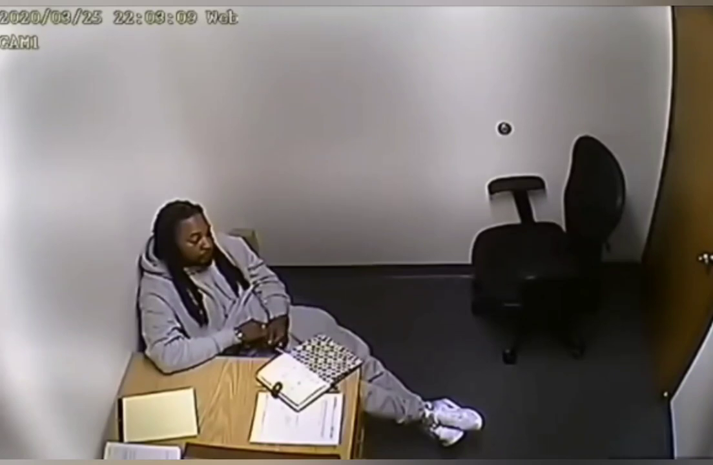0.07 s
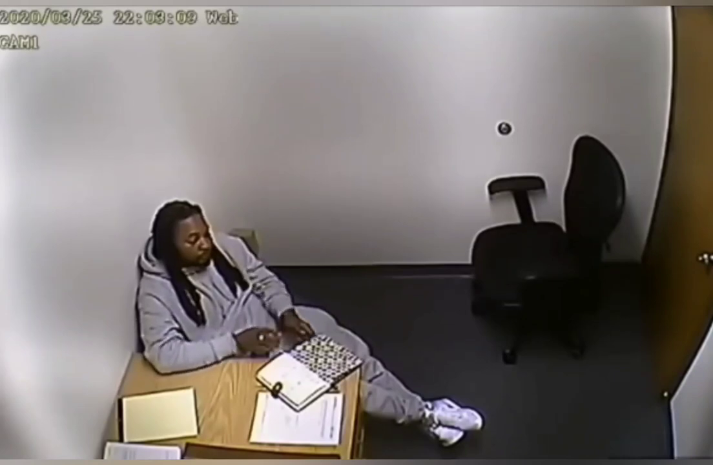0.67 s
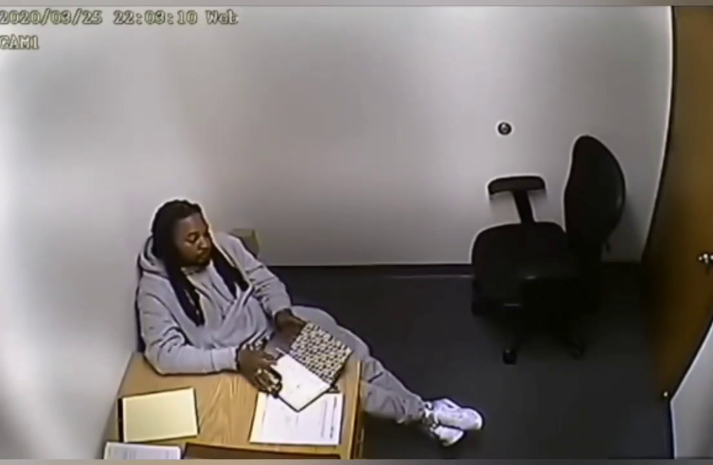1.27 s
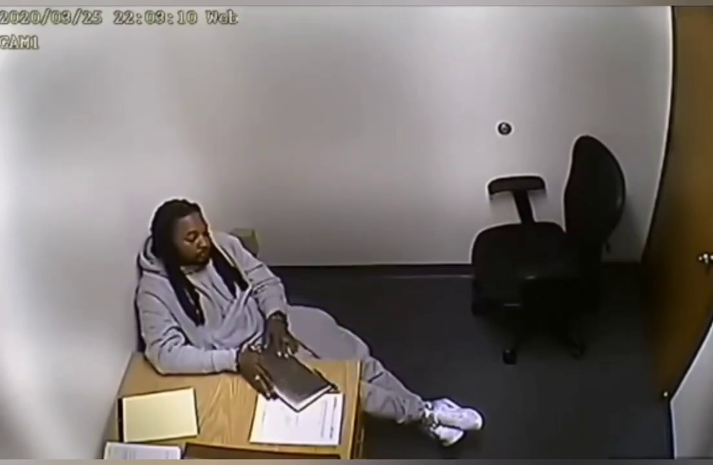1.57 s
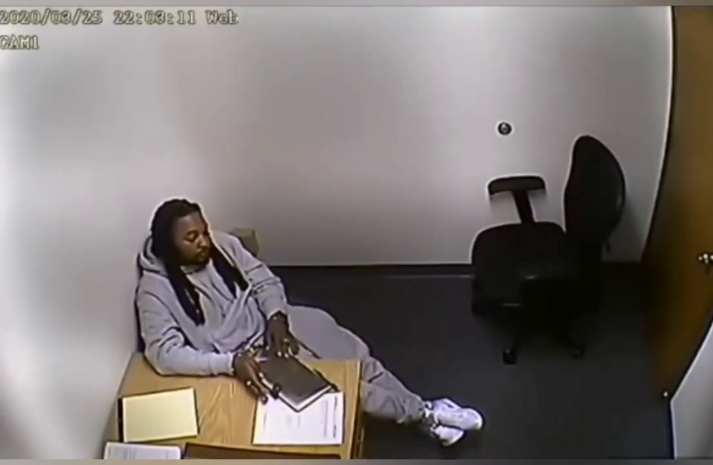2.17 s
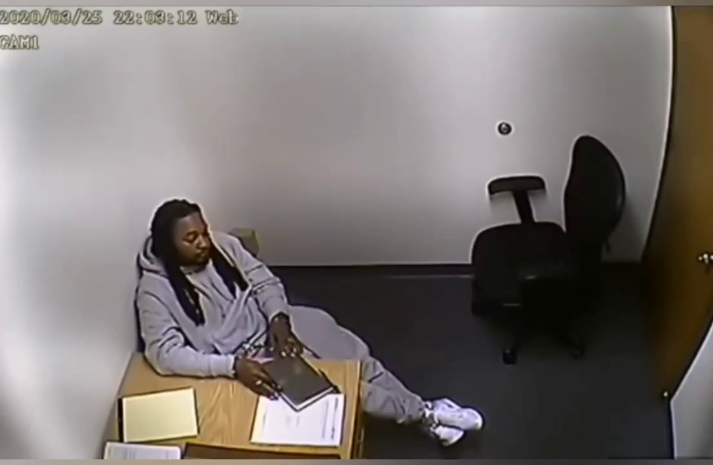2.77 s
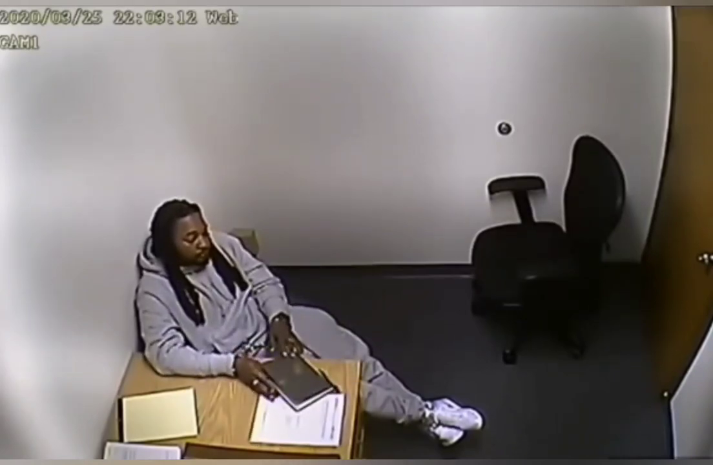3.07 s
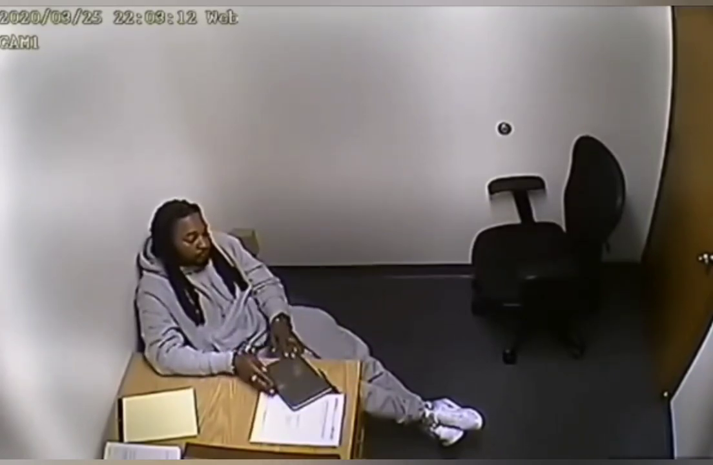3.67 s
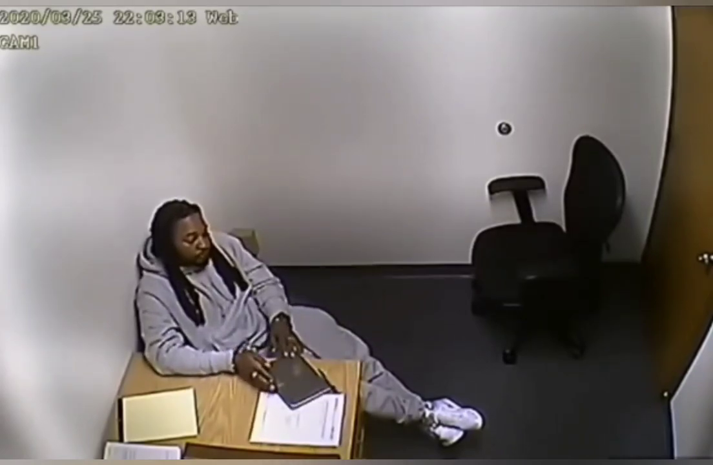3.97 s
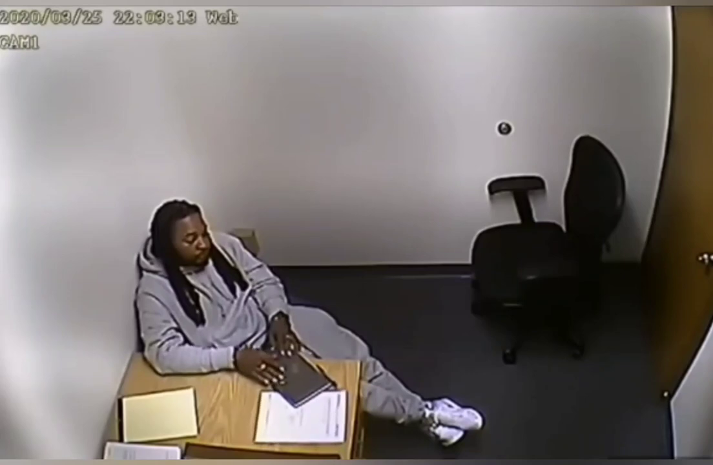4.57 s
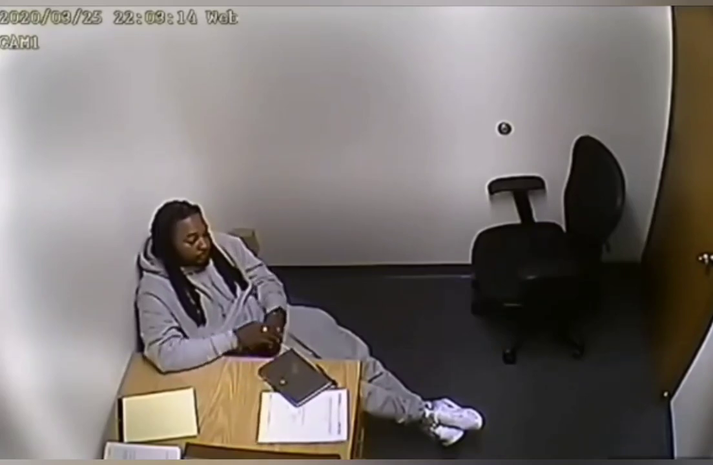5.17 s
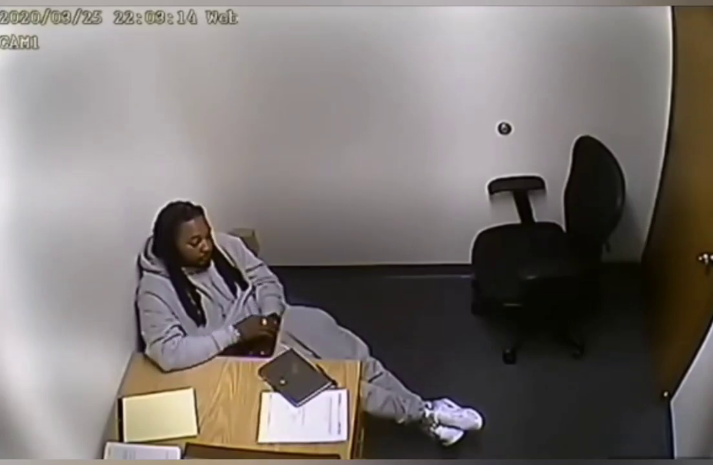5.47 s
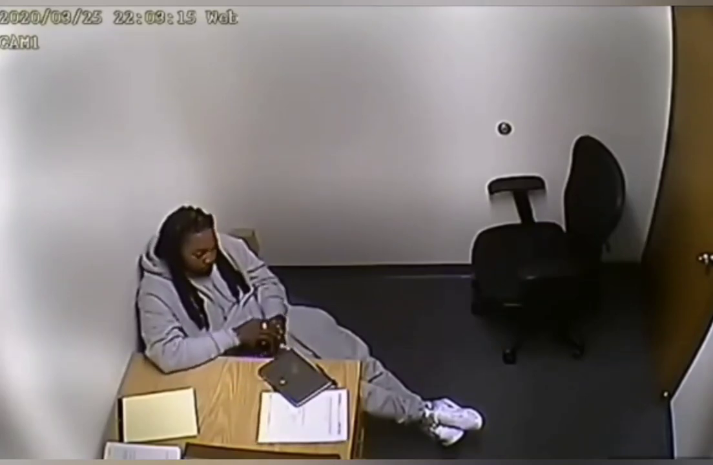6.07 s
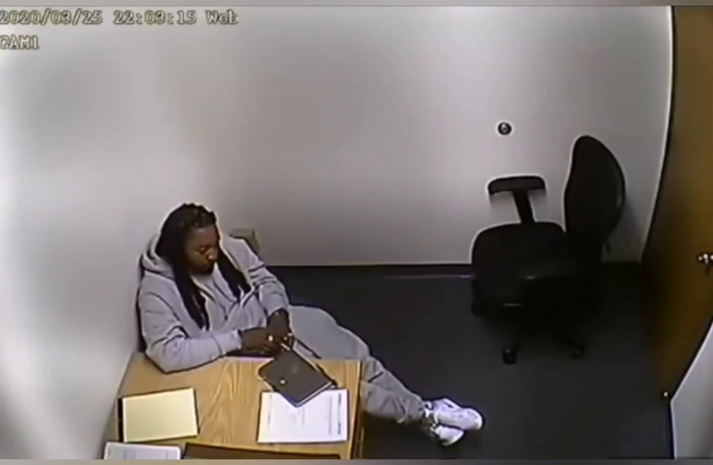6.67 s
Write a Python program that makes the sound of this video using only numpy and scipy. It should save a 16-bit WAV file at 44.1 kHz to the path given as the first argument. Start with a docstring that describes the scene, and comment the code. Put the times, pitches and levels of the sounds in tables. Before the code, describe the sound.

Steady ventilation hum and a faint electrical buzz run throughout in a small, bare room, heard through a narrow-sounding wall microphone. A brief paper rustle opens. At about 0.5 seconds a notebook bumps firmly on a wooden desk, followed by lighter knocks, small ticks and page rustles. Around 1.4 seconds it shuts with a short scrape and a cluster of hollow thuds, and another knock comes near 2 seconds. A soft bump and brief push follow at 2.8 seconds. At 3.6 seconds the notebook is slapped down, the loudest blow, booming and slightly overloading the microphone, with two sharp clicks just after. From 4 to 4.4 seconds it is dragged over the wood in a swelling, juddering scrape with several bumps. Faint pen and fingernail ticks continue until about 5.8 seconds, leaving only the hum until the end, near 7 seconds.

```python
"""A small, bare room: a notebook is bumped, shut, slapped down and dragged on a wooden desk.
Each blow sets the desk top and the room booming; pushed, the cover sticks and slips into a judder
and a scrape. Pages rustle, and cover, pen and fingernails tick, over a bed of steady ventilation
and faint mains buzz. A narrow-band wall microphone hears it all and overloads on the hardest blow."""
import sys
import numpy as np
from scipy import signal
from scipy.fft import rfft, irfft, next_fast_len
from scipy.io import wavfile

SR = 44100
rng = np.random.default_rng(int(sys.argv[2]) if len(sys.argv) > 2 else 0)


def master(y):
    """Save y as 16-bit WAV."""
    cut = np.clip(np.atleast_2d(y).T, -1, 1)
    pcm = np.round(cut * 32767)  # scale
    wavfile.write(sys.argv[1], SR, pcm.astype(np.int16))


N = 305613

# decay of the bare room: (frequency [Hz], t60 [s])
ROOM_DECAY = [(100, 0.9), (500, 0.27), (1200, 0.31), (3000, 0.23), (7000, 0.25)]
# rush of the ventilation: (frequency [Hz], relative level [dB])
AIR_SPECTRUM = [(15, -29.5), (25, 4), (44, -8.5), (76, 1), (126, -2.5), (200, -12), (255, -7.5), (350, -11),
                (490, -12), (700, -19.5), (970, -18), (1500, -26), (2600, -31), (5000, -43), (8000, -63)]
# duct and room resonances that the air keeps humming: (frequency [Hz], width [Hz], level [dB])
DUCT_HUMS = [(81, 17, -53), (126, 39, -46), (299, 17, -52.5), (470, 7.5, -52), (542, 9, -62), (654, 5, -58),
             (777, 63, -53.5)]
# tone of the mains buzz: (frequency [Hz], gain [dB])
BUZZ_EQ = [(500, -17.5), (1000, 7), (1700, 1), (2700, -3), (4000, -14), (5200, -24.5), (6500, -20),
           (8000, -23)]
# tone of the paper: (frequency [Hz], gain [dB])
PAPER_EQ = [(300, -49), (1000, 4), (2100, 8.5), (3200, 2), (5000, -5.5), (8000, -19)]
# paper and sleeves brushing: (start [s], hold [s], level [dB])
BRUSH_CUES = [(0.0, 0.005, -31), (0.712, 0.065, -39.5), (0.938, 0.011, -35.5), (1.01, 0.0092, -33),
              (1.299, 0.041, -51.5), (1.374, .035, -43), (1.754, 0.11, -51), (1.897, .045, -48),
              (4.70, .04, -53)]
# tone of a hard little contact: (frequency [Hz], gain [dB])
TICK_EQ = [(300, -46.5), (1000, -37), (1800, 6), (2800, 5), (3900, 3), (5000, -7.5), (8000, -22.5)]
# brief ring of small hard parts: (frequency [Hz], relative level [dB], t60 [s])
SMALL_PART_MODES = [(2800, -19, .1), (2900, 6.5, 0.077), (4430, 6.5, 0.054), (5200, -3, 0.07)]
# ticks of cover, pen and fingernails: (time [s], level [dB], share of ring [0-1])
TICK_CUES = [(0.502, -49, 0.2), (0.6048, -50.5, .7), (0.6416, -49.5, 0.3), (0.6975, -42, 0.1),
             (0.7125, -44, .3), (0.939, -41.5, .15), (1.003, -36, 0), (3.7207, -24, 0.08),
             (3.7341, -25.5, 0.1), (4.1603, -45.5, 0.18), (4.3024, -38.5, 0), (4.6949, -51, 0.12),
             (4.7307, -52.5, .2), (5.135, -61, 0.6), (5.3208, -54, .25), (5.4977, -52.5, 0.1),
             (5.6212, -47, 0.3), (5.7856, -61, .2)]
# modes of the desk in the room: (frequency [Hz], relative level [dB], t60 [s])
DESK_MODES = [(65.95, -8.5, 0.46), (126.4, -8.5, 0.34), (140.5, -2.5, 0.34), (175.3, 1.5, 0.42),
              (225.6, 1.5, 0.23), (258.6, -2, 0.41), (285.3, -21.5, 0.075), (329, 1.5, 0.15),
              (334, 2, 0.19), (369, -2, 0.27), (400.7, -0.5, 0.27), (434, 0.5, 0.29), (511.6, -1, 0.3),
              (614, 5.5, 0.13), (679, 7.5, 0.1), (678, -21.5, 0.09), (857, 2, 0.26), (978, -15.5, 0.38),
              (1023, -19.5, 0.36), (1083, -22.5, 0.078), (1214.3, 4, 0.13), (1337, -25, 0.29),
              (1390, 3.5, 0.037), (1625, -8, 0.23), (1935, 5, 0.041)]
# dense wood resonances between the modes: (frequency [Hz], gain [dB])
WOOD_EQ = [(25, -40), (65, -17), (105, -0.5), (170, -7), (330, 3.5), (650, 4), (780, -1.5), (1000, -2),
           (1500, -10.5), (2000, -11.5), (3200, -18.5), (5500, -28.5), (9000, -28)]
# how the open desk radiates, with a scoop in the bass: (frequency [Hz], gain [dB])
DESK_EQ = [(30, 10.5), (70, -3.5), (105, -6), (135, -2.5)]
# pushes over the wood, ahead of DESK_EQ: (start [s], swell [s], hold [s], judder [dB], scrape [dB])
DRAG_CUES = [(0.634, 0.011, .14, -29.5, -36), (1.321, 0.11, 0.073, -18, -34),
             (2.775, 0.024, 0.065, -23, -38), (3.17, 0.014, .14, -40, -71.5),
             (3.76, 0.0056, 0.031, -28, -46), (4.047, 0.22, 0.078, -14, -26.5)]
# blows on the desk, ahead of DESK_EQ; the spot struck decides which pitch rings most:
# (time [s], level [dB], ring pitch [Hz], thud [dB], treble hardness [dB])
KNOCK_CUES = [(0.523, -7, 705, 4, -5.5), (0.829, -14.5, 555, 2.5, -6.5), (1.001, -21.5, 967, 6.5, 1.5),
              (1.185, -27, 453, -4, -16), (1.39, -18, 261, 8, -13), (1.463, -17.5, 264.5, 1, -30.5),
              (1.482, -18.5, 606, 16.5, -15), (1.951, -14, 672, 1, -7), (2.13, -36, 580, 11, -10),
              (2.24, -31.5, 590, 17.5, -3), (2.75, -21.5, 320, 14.5, -6.5), (3.578, -1, 966, -4.5, -7.5),
              (3.608, -9.5, 1394, -2.5, -4), (3.722, -9, 530, -6.5, -15.5), (4.131, -21.5, 710, 18, -25),
              (4.224, -16, 977, 10, -12.5), (4.265, -14, 229, 10, -11), (4.333, -15, 153, 5, -18.5)]
# the low and high layers of a drag: (frequency [Hz], gain [dB])
JUDDER_EQ = [(60, -12.5), (140, 2.0), (300, 7.5), (450, -1), (900, -16), (2000, -39.5)]
SCRAPE_EQ = [(300, -20), (650, 11), (1100, -0.5), (1550, -5.5), (2000, -11), (3500, -22), (6000, -30)]


def amp(db):
    """Gain of a level in dB."""
    return 10 ** (np.asarray(db) / 20)


def unit(x):
    """x at rms 1."""
    return x / np.sqrt(np.mean(x ** 2) + 1e-20)


def at_level(sound, db, head_s=0.05):
    """A hit scaled so that its head has the given rms level."""
    return amp(db) * sound / np.sqrt(np.mean(sound[:round(head_s * SR)] ** 2))


def along(points, hz):
    """Read a curve of (frequency [Hz], value) points on a log frequency axis."""
    f, v = np.transpose(points)
    return np.interp(np.log(hz + 1), np.log(f + 1), v)


def filtered(x, response):
    """x through a zero-phase filter whose gain is response(frequency)."""
    m = next_fast_len(len(x) + SR // 4)
    return irfft(rfft(x, m) * response(np.fft.rfftfreq(m, 1 / SR)), m)[:len(x)]


def eq(x, points):
    """Minimum-phase EQ through (frequency [Hz], gain [dB]) points: nothing rings ahead of a hit."""
    m = 2 * next_fast_len(len(x))
    cepstrum = irfft(np.log(amp(along(points, np.fft.rfftfreq(m, 1 / SR)))))
    cepstrum[1:m // 2] *= 2
    cepstrum[m // 2 + 1:] = 0
    return irfft(rfft(x, m) * np.exp(rfft(cepstrum)), m)[:len(x)]


def add(track, start, sound):
    """Mix a sound in at a start time in seconds."""
    part = track[max(round(start * SR), 0):][:len(sound)]
    part += sound[:len(part)]


def stroke(texture, start, swell, hold, grip_db_s, swell_db_s, fall_db_s):
    """Ride the fader on a texture: it takes hold, swells, holds at about rms 1 and dies away."""
    t = np.arange(N) / SR - start
    grip_db = grip_db_s * np.maximum(-t, 0)
    swell_db = swell_db_s * np.maximum(swell - t, 0)
    fall_db = fall_db_s * np.maximum(t - swell - hold, 0)
    gain = amp(-grip_db - swell_db - fall_db)
    return unit(texture * gain) * np.sqrt(np.mean(gain ** 2))


def noise_burst(samples, t60):
    """A snap of white noise that falls 60 dB in t60 seconds."""
    return rng.standard_normal(samples) * amp(-60 * np.arange(samples) / SR / t60)


def slips(per_s, spread_db):
    """Friction as irregular little impulses of uneven size, rms 1."""
    return unit((rng.random(N) < per_s / SR) * rng.choice([-1, 1], N)
                * amp(spread_db * rng.standard_normal(N)))


def ringing(modes, scatter_db):
    """Decaying modes, energy 1 in all, in a new balance for each contact."""
    t = np.arange(SR // 2) / SR
    hz, db, t60 = np.transpose(modes)[:, :, None]
    strength_db = db + scatter_db * rng.standard_normal(hz.shape)
    tones = np.sin(2 * np.pi * (hz * t + rng.random(hz.shape)))
    ring = np.sum(amp(strength_db - 60 * t / t60) * tones, axis=0)
    return ring / np.linalg.norm(ring)


def room_tail():
    """Dense reflections off bare walls, energy 1; the bass hangs on longest."""
    hz, t, noise = signal.stft(rng.standard_normal(SR // 2), SR, nperseg=256)
    decay = amp(-60 * t / along(ROOM_DECAY, hz)[:, None])
    tail = signal.istft(noise * decay, SR, nperseg=256)[1][:SR // 2]
    return tail / np.linalg.norm(tail)


def ventilation(air_db=-38):
    """The bed: an even rush of air with a few narrow humming resonances."""
    air = unit(filtered(rng.standard_normal(N), lambda f: amp(along(AIR_SPECTRUM, f))))
    hum = np.zeros(N)
    for hz, width, db in DUCT_HUMS:
        band = filtered(rng.standard_normal(N), lambda f: 1 / (1 + (2 * (f - hz) / width) ** 2))
        hum += amp(db) * unit(band)
    return amp(air_db) * air + hum


def mains_buzz(mains_hz=60, db=-56.5):
    """The mains leaks into the microphone line: one short burst each half cycle, alternating in sign."""
    half_cycles = np.floor(2 * mains_hz * np.arange(N) / SR)
    spikes = np.diff(half_cycles % 2, prepend=0)
    bursts = signal.fftconvolve(spikes, noise_burst(SR // 50, t60=0.007))[:N]
    return amp(db) * unit(eq(bursts, BUZZ_EQ))


def rustle():
    """Paper fibres catch and let go in quick brushes, blurred by the room."""
    grains = signal.fftconvolve(slips(per_s=280, spread_db=6), room_tail())[:N]
    paper = eq(grains, PAPER_EQ)
    return sum(amp(db) * stroke(paper, start, 0, hold, grip_db_s=999.5, swell_db_s=0, fall_db_s=265)
               for start, hold, db in BRUSH_CUES)


def ticks(direct_gain=0.84, pitch_spread=0.05):
    """Small hard parts touch: a sharp snap, a brief ring and the answer of the bare walls."""
    out = np.zeros(N)
    for start, db, ring_share in TICK_CUES:
        snap = noise_burst(SR // 2, t60=0.0056)
        click = eq(room_tail() + direct_gain * snap / np.linalg.norm(snap), TICK_EQ)
        detune = np.exp(pitch_spread * rng.standard_normal())  # each tick strikes a different part
        ring = ringing(np.multiply(SMALL_PART_MODES, [detune, 1, 1]), scatter_db=5)
        add(out, start, at_level((1 - ring_share) * click + ring_share * ring, db))
    return out


def desk_ring(walls, dense_db):
    """The desk's answer to one contact, energy 1: clear modes, and dense ones blurred by the walls."""
    dense = eq(walls + 1.29 * room_tail(), WOOD_EQ)  # paths to the microphone change from spot to spot
    ring = unit(ringing(DESK_MODES, scatter_db=2)) + amp(dense_db) * unit(dense)
    return ring / np.linalg.norm(ring)


def drags(walls):
    """The cover sticks and slips: the desk judders, and the fine grain scrapes above it."""
    judder = signal.fftconvolve(slips(per_s=350, spread_db=5.5), desk_ring(walls, dense_db=-5))[:N]
    judder = unit(eq(judder, JUDDER_EQ))
    scrape = signal.fftconvolve(slips(per_s=900, spread_db=8), walls)[:N]
    scrape = unit(eq(scrape, SCRAPE_EQ))
    fades = dict(grip_db_s=252.5, fall_db_s=158)
    out = np.zeros(N)
    for start, swell, hold, judder_db, scrape_db in DRAG_CUES:  # both layers swell as the push builds
        out += amp(judder_db) * stroke(judder, start, swell, hold, swell_db_s=83.5, **fades)
        out += amp(scrape_db) * stroke(scrape, start, swell, hold, swell_db_s=110.5, **fades)
    return out


def blow(walls, db, ring_hz, thud_db, hard_db, ring_db):
    """One hit on the desk: heavy ones thud, hard ones clack, soft ones bloom with the reflections."""
    full_attack_db, bloom_s = 4.5, 0.006
    attack = min(amp(hard_db - full_attack_db), 1)  # the harder the hit, the sharper its front
    rise = 1 - (1 - attack) * np.exp(-np.arange(SR // 2) / SR / bloom_s)
    clack_db = 2 + 0.35 * hard_db
    slap_db = 3 + 0.79 * hard_db
    contact_eq = [(170, thud_db), (330, 0), (700, 0), (900, clack_db), (1750, slap_db), (2800, hard_db)]
    spot_eq = [(ring_hz / 1.15, 0), (ring_hz, ring_db), (ring_hz * 1.1, 0)]
    body = desk_ring(walls, dense_db=-0.5) * rise
    return at_level(eq(eq(body, contact_eq), spot_eq), db)


def knocks(walls, settle_s=0.017, face_hz=343):
    """The notebook lands on an edge, and its face settles just after, softer and duller."""
    out = np.zeros(N)
    for start, db, ring_hz, thud_db, hard_db in KNOCK_CUES:
        add(out, start, blow(walls, db, ring_hz, thud_db, hard_db, ring_db=10.5))
        face_db = -3 + 1.81 * db  # the heavier the blow, the more the face counts
        add(out, start + settle_s, blow(walls, face_db, face_hz, thud_db, hard_db - 16, ring_db=3.5))
    return out


def scene():
    """The mono mix: the desk up front, ticks and paper around it, air and buzz underneath."""
    walls = room_tail()
    desk = eq(knocks(walls) + drags(walls), DESK_EQ)
    return (desk + ticks() + rustle() + ventilation() + mains_buzz())[None]


def record(dry):
    """The wall microphone's chain: a narrow band, a faint sheen above it, and loud peaks flattened."""
    band_hz, clock_hz, sheen_hz, top_hz = 5990, 16000, 12100, 15700
    ceiling = 0.72
    narrow = filtered(dry[0], lambda f: 1 / np.sqrt(1 + (f / band_hz) ** 22))
    t = np.arange(N) / SR
    clock = np.arange(0, t[-1], 1 / clock_hz)
    samples = np.interp(clock, t, narrow)
    joined = np.interp(t, clock, samples)  # straight joins mirror a sheen into the treble
    clipped = joined / (1 + np.abs(joined / ceiling) ** 4) ** (1 / 4)
    return filtered(clipped, lambda f: (f < top_hz) / np.sqrt(1 + (f / sheen_hz) ** 10))[None]


dry = scene()
out = record(dry)
master(out)
```